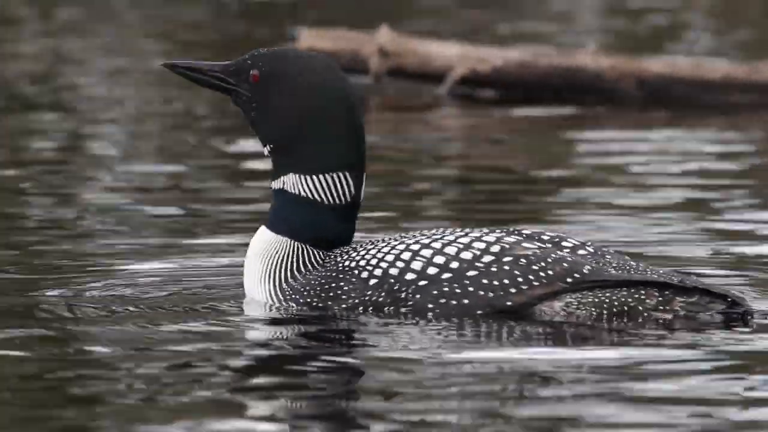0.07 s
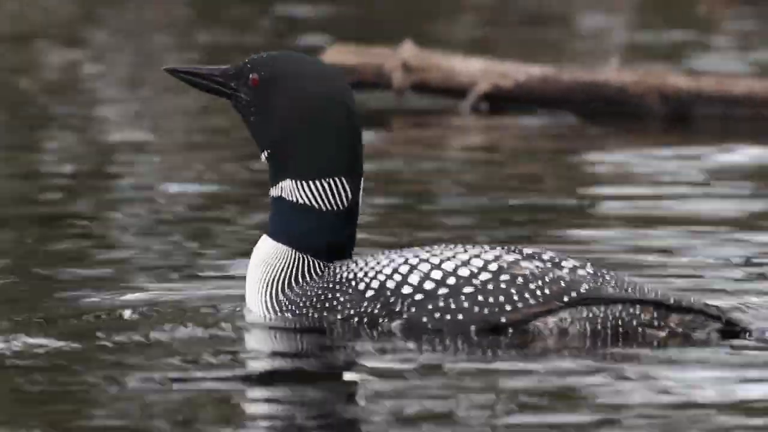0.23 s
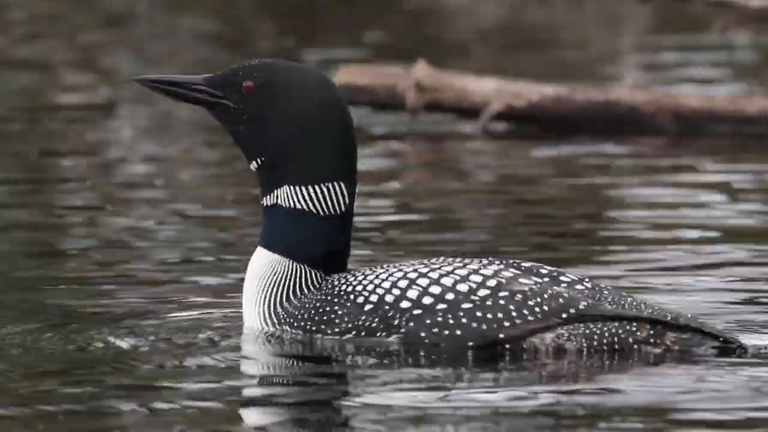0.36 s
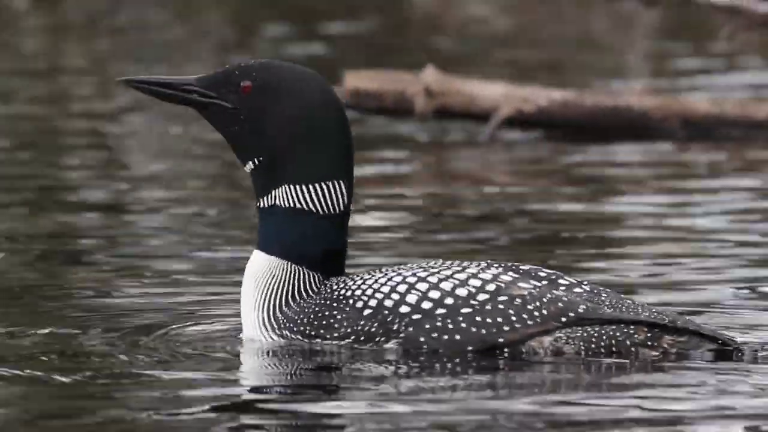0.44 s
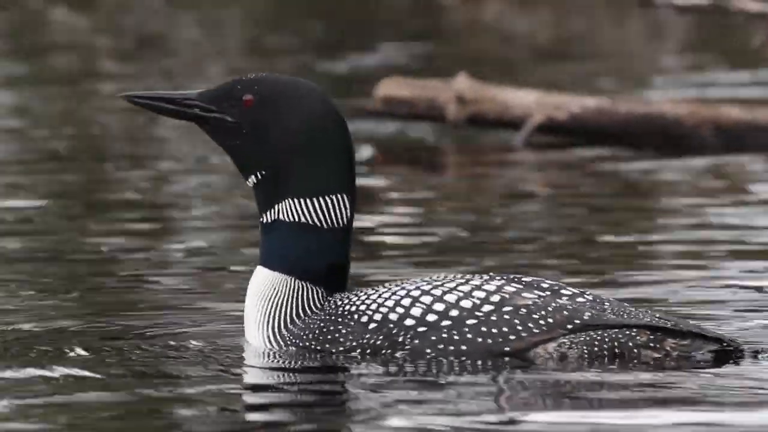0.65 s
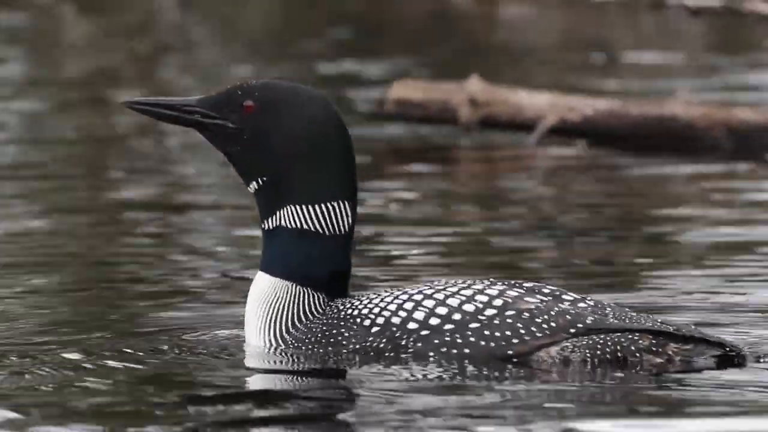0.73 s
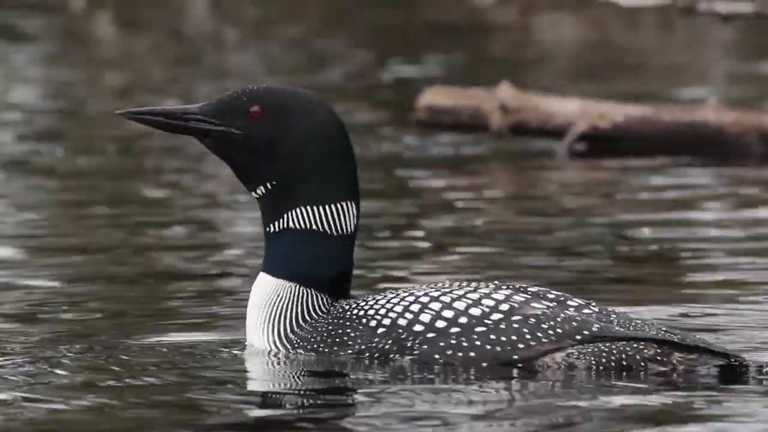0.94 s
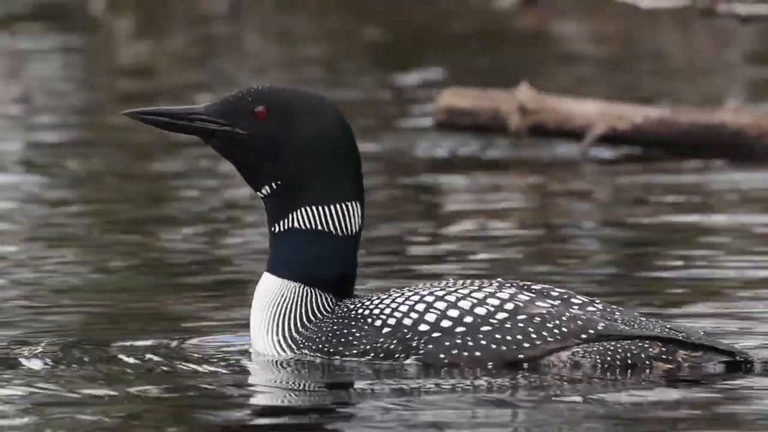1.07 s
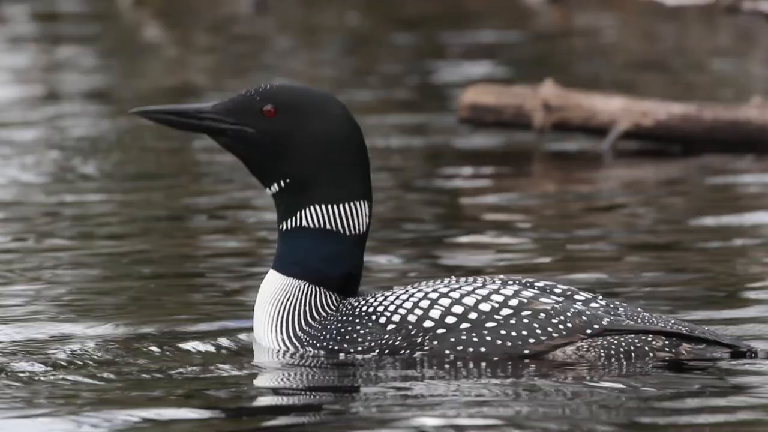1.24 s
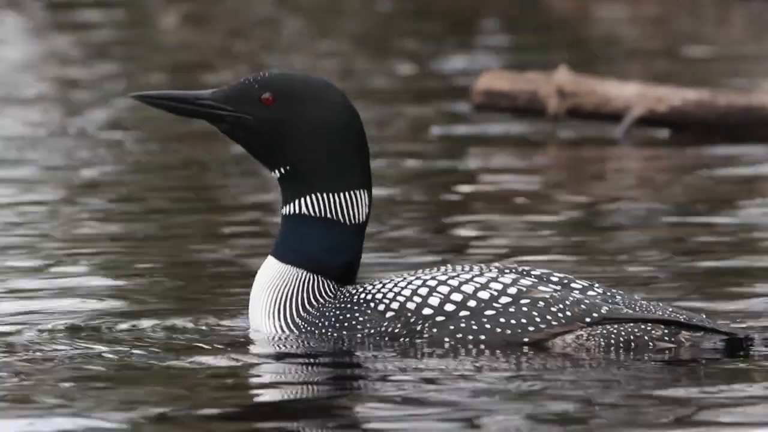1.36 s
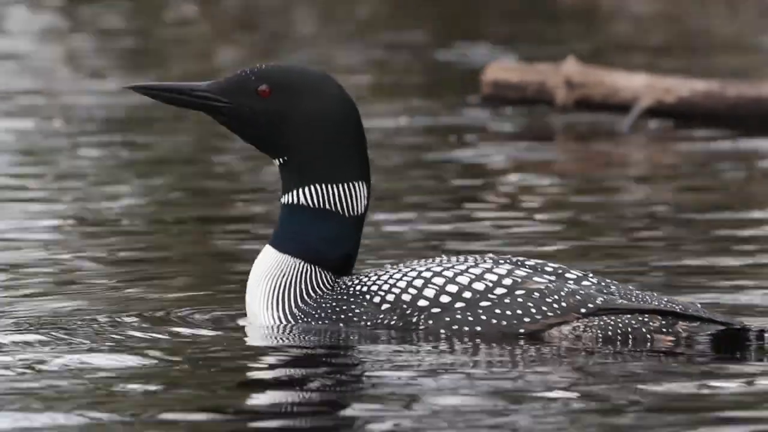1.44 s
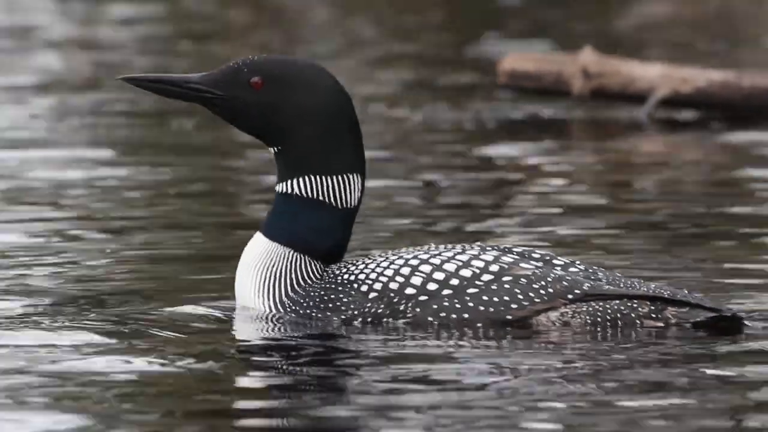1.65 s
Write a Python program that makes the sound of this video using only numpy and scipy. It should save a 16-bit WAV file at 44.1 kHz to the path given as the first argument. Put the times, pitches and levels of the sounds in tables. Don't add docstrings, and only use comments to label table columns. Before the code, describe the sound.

A loon's clear wail leaps upward, holds with a slight flutter, then cracks down over quiet water

```python
import sys
import numpy as np
from scipy import signal
from scipy.io import wavfile
from scipy.ndimage import uniform_filter1d

SR = 44100
rng = np.random.default_rng(int(sys.argv[2]) if len(sys.argv) > 2 else 0)


def field_ratio(decibels):
    return 10 ** (np.asarray(decibels, dtype=float) / 20)


def store_wav(level_fs):
    pcm = np.round(np.clip(np.atleast_2d(level_fs), -1, 1) * 32767)
    wavfile.write(sys.argv[1], SR, pcm.T.astype(np.int16))


N = 74970


def walk(rate):
    k = max(int(SR / rate), 2)
    steps = np.repeat(rng.standard_normal(N // k + 1), k)
    drift = uniform_filter1d(uniform_filter1d(steps, k), k)[:N]
    return drift / drift.std()


def level(x, db):
    return x * field_ratio(db) / np.sqrt(np.mean(x ** 2))


def band(x, hz, width_hz):
    return signal.lfilter(*signal.iirpeak(min(hz, 0.45 * SR), hz / width_hz, fs=SR), x)


def noise_band(hz, width_hz):
    return band(band(rng.standard_normal(N), hz, width_hz), hz, width_hz)


def lake():
    # frequency in Hz, wind level in dB per Hz.
    wind_spectrum = np.array([(18, -49), (30, -25), (317, -6.5), (815, -10), (953, -10), (1560, -11),
                              (1900, -22.5), (2580, -23.5), (15700, -36)])
    wind_db, lap_db = -62, -71.5
    swell = walk(1.5)
    wind = 0
    for hz in 40 * 2 ** (np.arange(27) / 3):
        db = np.interp(np.log(hz), np.log(wind_spectrum[:, 0]), wind_spectrum[:, 1])
        db = db + 0.2 * swell + 0.95 * walk(7.9)
        wind = wind + field_ratio(db) * np.sqrt(hz) * level(noise_band(hz, hz / 4), 0)
    lap = noise_band(1487, 93) * field_ratio(3.5 * walk(15))
    return level(wind, wind_db) + level(lap, lap_db)


def drips():
    # time in seconds, peak level in dB, frequency in Hz.
    drops = [
        (.186, -70.5, 13000),
        (.59, -67, 10870),
        (1.683, -71, 12970),
    ]
    drip_s = 0.0012
    t = np.arange(N) / SR
    ticks = 0
    for start, db, hz in drops:
        burst = level(band(rng.standard_normal(N), hz, 1500), 0)
        ticks = ticks + field_ratio(db) * np.exp(-((t - start) / drip_s) ** 2) * burst
    return ticks


def scatter(shape, db):
    return field_ratio(db) * shape * rng.standard_normal(N) / np.sqrt(np.sum(shape ** 2))


def shores(call):
    # delay in seconds, echo level in dB.
    cliffs = [
        (.51, -33.5),
        (.8, -33),
    ]
    bank_t60_s, bank_db = 0.31, -27
    shore_s, shore_rise_s, shore_t60_s, shore_db = 0.48, 0.26, 6.1, -32
    cliff_smear_s, top_hz = 0.013, 1720
    t = np.arange(N) / SR
    bank = field_ratio(-60 * t / bank_t60_s)
    trees = field_ratio(-60 * t / shore_t60_s) * np.clip((t - shore_s) / shore_rise_s, 0, 1) * (t < 1.3)
    echo = scatter(bank, bank_db) + scatter(trees, shore_db)
    for delay, db in cliffs:
        echo = echo + scatter(np.exp(-((t - delay) / cliff_smear_s) ** 2), db)
    dull = signal.butter(2, top_hz, fs=SR, output="sos")
    return signal.sosfilt(dull, signal.fftconvolve(call, echo)[:N])


def voice_slips():
    # time in seconds, level in dB against the voice.
    catches = [
        (0.201, -27),
        (0.444, -18.5),
        (.59, -42),
        (.885, -40),
        (1.05, -42),
        (1.356, -23.5),
    ]
    catch_s = 0.004
    t = np.arange(N) / SR
    catch = sum(field_ratio(db) * np.exp(-((t - s) / catch_s) ** 2) for s, db in catches)
    noise = band(band(rng.standard_normal(N), 1100, 1000), 1100, 1400)
    return catch * level(noise, 0)


def register(curve, tones, turn_s, flutter, pitch=None, loud=None, close_s=9):
    jitter, jitter_per_s, flutter_pitch_hz, flutter_depth = 0.0026, 48, 2.3, 0.043
    break_s, bloom_s = 0.0036, 0.0095
    wander_db, wander_per_s, shimmer_db = 1.1, 18.08, 0.46
    second_share, tilt_per_order = 0.35, 0.055
    rasp_depth, rasp_per_s = 0.3, 260
    close_db_per_s = 326
    breath_db, breath_hz, breath_width_hz = -51, 2600, 5500

    t = np.arange(N) / SR
    curve = np.array(curve, float)
    pitch = curve if pitch is None else np.array(pitch, float)
    hz = np.interp(t, pitch[:, 0], pitch[:, 1]) * (1 + jitter * walk(jitter_per_s))
    phase = 2 * np.pi * np.cumsum(hz + flutter_pitch_hz * flutter) / SR

    inside = np.minimum(t - curve[0, 0], curve[-1, 0] - t) + break_s
    gate = np.sin(np.pi / 2 * np.clip(inside / break_s, 0, 1)) ** 2
    bloom = np.sin(np.pi / 2 * np.clip(inside / bloom_s, 0, 1)) ** 2

    count = min(map(len, tones))
    colours = np.array([np.array(tone)[:count, 1] - tone[0][1] for tone in tones])
    colour_db = np.array([np.interp(t, turn_s, db) for db in colours.T])
    push_db = np.interp(t, curve[:, 0], curve[:, -1])
    if loud is None:
        voice_db = np.interp(t, curve[:, 0], curve[:, -2])
    else:
        voice_db = np.interp(t, *np.array(loud).T)
        push_db = push_db - voice_db
    push_db = push_db - 10 * np.log10(np.sum(field_ratio(colour_db[2:]) ** 2, axis=0))

    rasp = rasp_depth * np.clip(uniform_filter1d(np.abs(flutter), 4000) + 0.25, 0, 1.2)
    close_db = close_db_per_s * np.clip(t - close_s, 0, None)
    second_db = colour_db[1] + second_share * push_db + 1.1 * walk(wander_per_s)
    voice = np.sin(phase) + field_ratio(second_db) * np.sin(2 * phase + 1)
    for k in range(2, len(colour_db)):
        db = colour_db[k] + push_db * (1 + tilt_per_order * (k - 4)) + wander_db * walk(wander_per_s)
        db = db - close_db * min((k - 2) / 3, 1)
        roughness = 1 + rasp * np.tanh(walk(rasp_per_s)) * 1.57
        voice = voice + bloom * field_ratio(db) * roughness * np.sin((k + 1) * phase + k * k)

    breath = level(band(rng.standard_normal(N), breath_hz, breath_width_hz), breath_db) * (1 + np.sin(phase))
    swell = field_ratio(voice_db + shimmer_db * walk(35)) * (1 + flutter_depth * flutter)
    return np.sqrt(2) * gate * swell * (voice + breath * field_ratio(push_db) + voice_slips())


def loon():
    # time in seconds, pitch in Hz, fundamental in dB, overtone push in dB.
    low, rise, fall = [(0.104, 363.4, -69.5, -13.5), (0.118, 385.5, -51, -13), (0.15, 437.6, -48, -9.5),
                       (0.18, 499, -49, -24), (0.19, 535, -49, -24), (0.196, 590, -48, -28.5)], [(0.2, 644, -41, -45.5), (0.212, 663.6, -38.5, -32.5),
                                    (0.27, 687.5, -37, -28), (0.286, 716.3, -34.5, -37),
                                    (0.364, 744.7, -31, -30.5), (0.392, 758, -33.5, -28.5),
                                    (0.424, 774.6, -33, -27.5), (0.437, 795, -30, -29.5),
                                    (0.443, 855, -32.5, -33)], [(1.356, 824, -35, -30), (1.361, 727, -34, -27.5),
                                                  (1.4, 695, -37, -26), (1.42, 672, -37.5, -30),
                                                  (1.44, 639, -38, -24), (1.456, 624, -43.5, -33),
                                                  (1.472, 635, -60.5, -41)]
    # time in seconds, overtones in dB re full scale.
    held = [(0.448, -59.5), (0.548, -53), (0.7, -50.5), (0.745, -51), (0.816, -50.5), (0.868, -52),
            (0.944, -51.5), (1.0, -53.5), (1.045, -53.5), (1.06, -52), (1.128, -52.5), (1.2, -55),
            (1.304, -59), (1.35, -68)]
    # time in seconds, pitch in Hz.
    held_pitch = [(0.446, 938), (0.46, 930.4), (0.49, 950), (0.53, 962.6), (0.712, 994.3), (0.746, 986),
                  (0.788, 999), (0.872, 974.6), (0.886, 984.3), (0.989, 977.3), (1.054, 956.4),
                  (1.083, 970.3), (1.219, 942.4), (1.353, 928.6)]
    # time in seconds, fundamental in dB.
    held_level = [(0.448, -28), (0.488, -27), (0.686, -23), (0.824, -25.5), (0.904, -22.5), (1.062, -26.5),
                  (1.318, -27.5), (1.35, -32)]
    # time in seconds, flutter strength as a factor.
    flutter_strength = [(.52, 0.11), (.59, 1.2), (.66, 0.11), (.73, 0.6), (.78, .9), (.89, 1.5), (.97, 1),
                        (1.05, 0.68), (1.2, 0.36), (1.3, 0.058)]
    # multiple of the pitch, level in dB.
    low_tone = [(1, 4), (2, 2), (3, -12.5), (4, -28.5)]
    rise_a, rise_b, rise_c = [(1, 3), (2, -13.5), (3, -29.5), (4, -39), (5, -39), (6, -46.5), (7, -54),
                              (8, -52.5), (9, -44.5), (10, -54), (11, -51), (12, -53.5), (13, -53.5),
                              (14, -54)], [(1, 3), (2, -13.5), (3, -52.5), (4, -47.5), (5, -46),
                                                   (6, -39), (7, -57), (8, -47), (9, -35), (10, -55),
                                                   (11, -52), (12, -46), (13, -50.5), (14, -53.5)], [(1, 1), (2, -15), (3, -33),
                                                                        (4, -43.5), (5, -34), (6, -40),
                                                                        (7, -53.5), (8, -35), (9, -39),
                                                                        (10, -44.5), (11, -48), (12, -37.5),
                                                                        (13, -48), (14, -42.5)]
    held_a, held_b, held_c = [(1, 1), (2, -31), (3, -36), (4, -35.5), (5, -39), (6, -52.5), (7, -35),
                              (8, -44.5), (9, -47.5), (10, -47.5), (11, -62.5), (12, -43.5), (13, -61.5),
                              (14, -59), (15, -55), (16, -62.5)], [(1, 1), (2, -34.5), (3, -30.5), (4, -39), (5, -39.5),
                                                   (6, -57.5), (7, -30.5), (8, -39), (9, -50), (10, -50.5),
                                                   (11, -54.5), (12, -59.5), (13, -68.5), (14, -62),
                                                   (15, -63), (16, -68.5)], [(1, 0.5), (2, -29), (3, -28.5),
                                                                        (4, -33), (5, -38), (6, -53),
                                                                        (7, -35), (8, -39.5), (9, -44),
                                                                        (10, -42.5), (11, -44.5),
                                                                        (12, -52.5), (13, -64), (14, -65),
                                                                        (15, -66.5), (16, -73.5)]
    held_d, held_e, held_f = [(1, 0), (2, -30), (3, -32.5), (4, -44), (5, -39), (6, -59), (7, -32.5),
                              (8, -38), (9, -41.5), (10, -48.5), (11, -48.5), (12, -54), (13, -67.5),
                              (14, -65.5), (15, -68), (16, -58.5)], [(1, -2), (2, -30.5), (3, -31.5), (4, -42), (5, -38.5),
                                                   (6, -61), (7, -29), (8, -39.5), (9, -39), (10, -38),
                                                   (11, -57), (12, -56.5), (13, -55), (14, -63.5),
                                                   (15, -63.5), (16, -46)], [(1, 0), (2, -34.5), (3, -30.5),
                                                                        (4, -52), (5, -43.5), (6, -62),
                                                                        (7, -37.5), (8, -52.5), (9, -44),
                                                                        (10, -38), (11, -48), (12, -43),
                                                                        (13, -53.5), (14, -68), (15, -65.5),
                                                                        (16, -63.5)]
    fall_a, fall_b = [(1, 1), (2, -13.5), (3, -34), (4, -38), (5, -42), (6, -31), (7, -52), (8, -58),
                      (9, -34), (10, -37.5), (11, -50), (12, -45.5), (13, -35), (14, -38.5), (15, -47)], [(1, 1), (2, -10), (3, -39.5), (4, -42.5), (5, -43), (6, -43),
                                         (7, -34), (8, -57), (9, -47), (10, -31.5), (11, -44), (12, -48.5),
                                         (13, -39), (14, -34), (15, -45.5)]
    rise_turn_s, held_turn_s, fall_turn_s = (.278, .29, .34, .39), (.48, .58, .76, .96, 1.06, 1.25), (1.5, 1.405)
    flutter_hz = 76

    t = np.arange(N) / SR
    beat = np.cos(2 * np.pi * np.cumsum(flutter_hz * (1 + 0.13 * walk(35))) / SR)
    flutter = beat * np.interp(t, *np.array(flutter_strength).T) * field_ratio(1.8 * walk(39.5))
    steady = np.zeros(N)
    call = register(low, [low_tone], [0], steady)
    call = call + register(rise, [rise_a, rise_b, rise_b, rise_c], rise_turn_s, steady)
    call = call + register(held, [held_a, held_b, held_c, held_d, held_e, held_f], held_turn_s, flutter,
                           held_pitch, held_level, close_s=1.285)
    return call + register(fall, [fall_a, fall_b], fall_turn_s, steady, close_s=1.4)


def scene():
    call = loon()
    return (call + shores(call) + lake() + drips())[None, :]


def top_cut(x):
    return signal.sosfilt(signal.butter(12, 15890, fs=SR, output="sos"), x)


def record(dry):
    return top_cut(dry)


dry = scene()
out = record(dry)
store_wav(out)
```